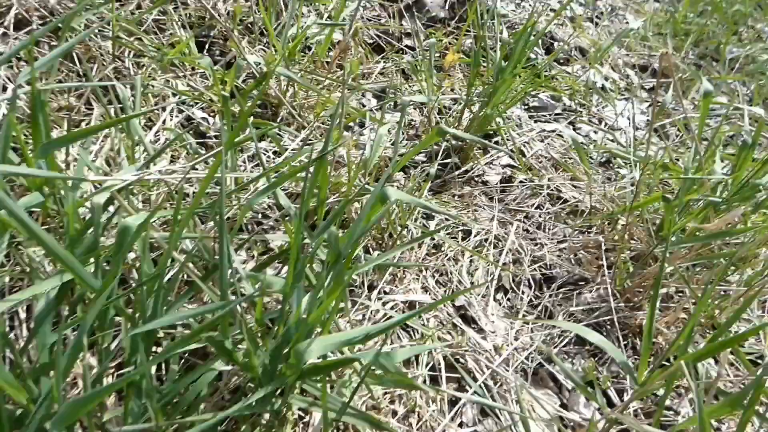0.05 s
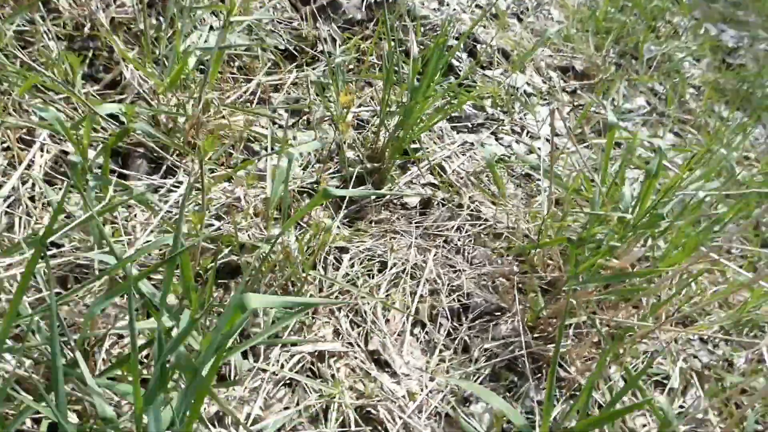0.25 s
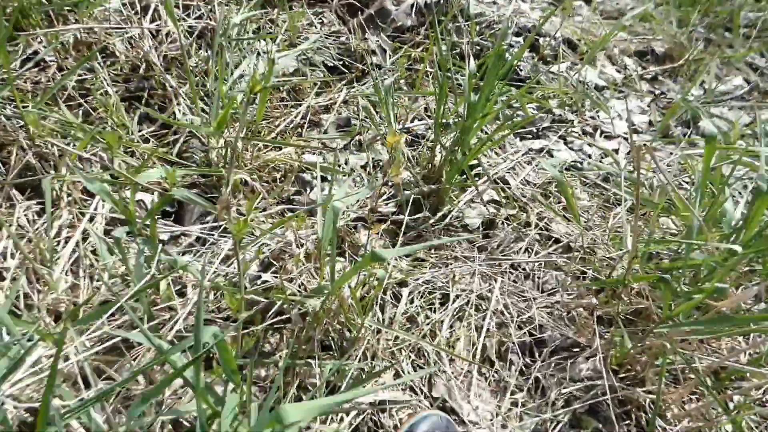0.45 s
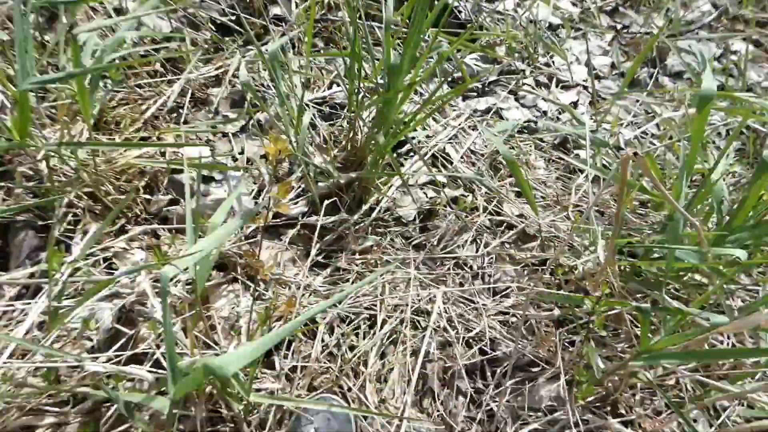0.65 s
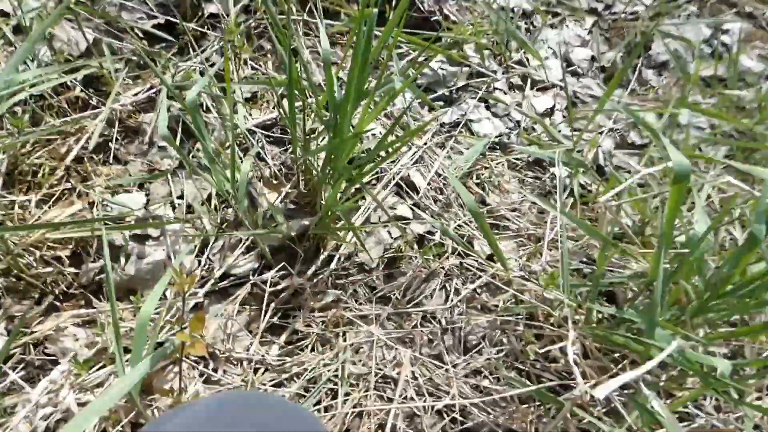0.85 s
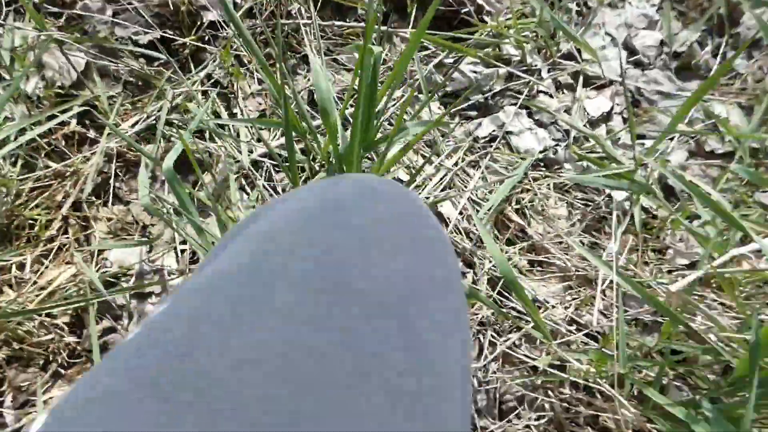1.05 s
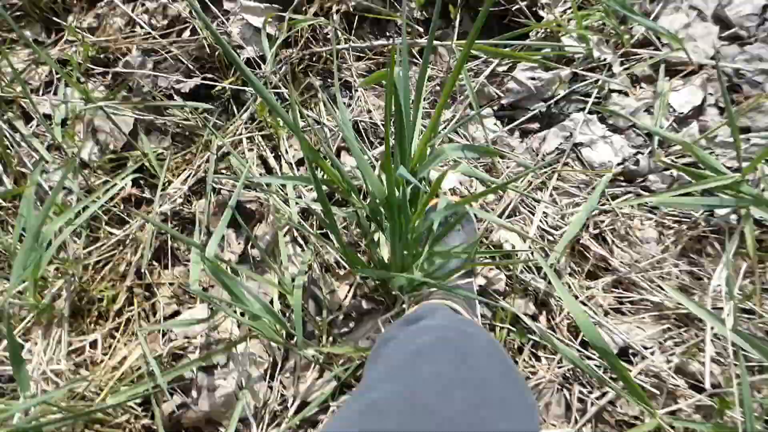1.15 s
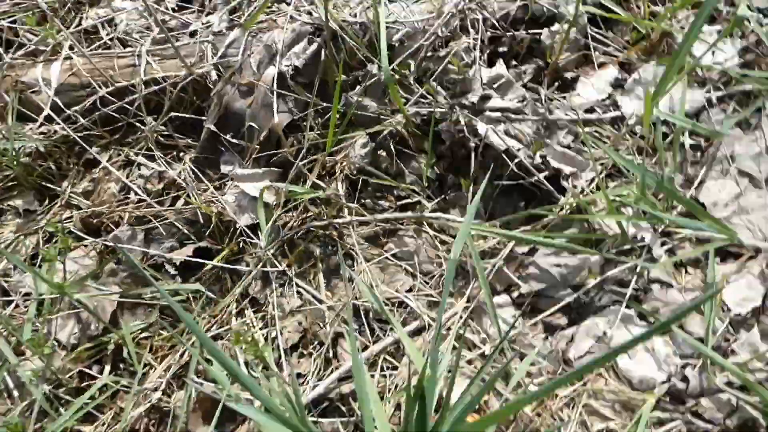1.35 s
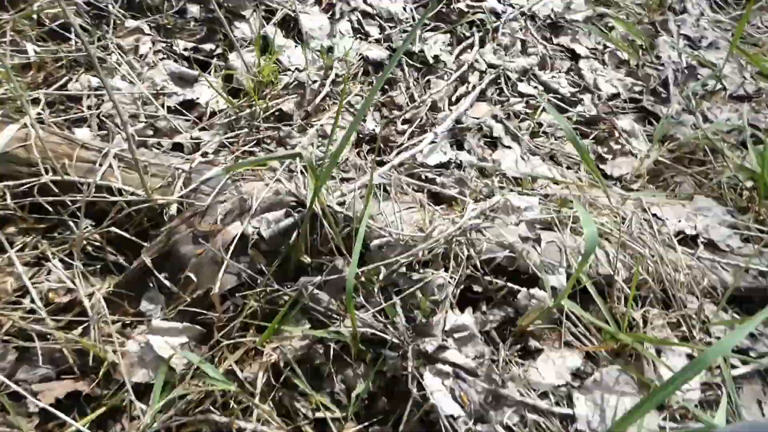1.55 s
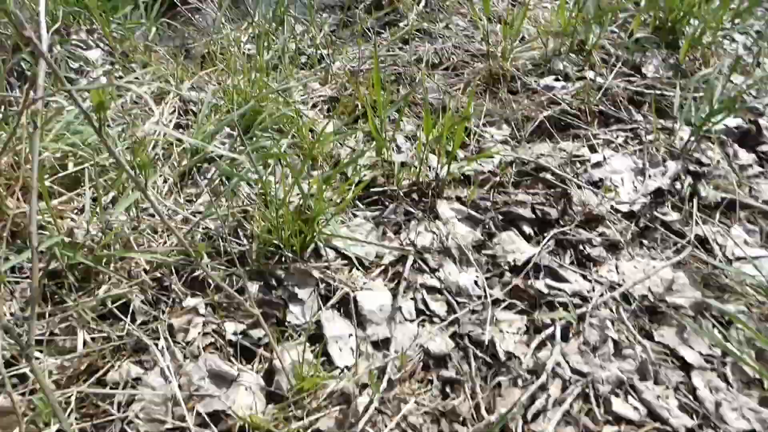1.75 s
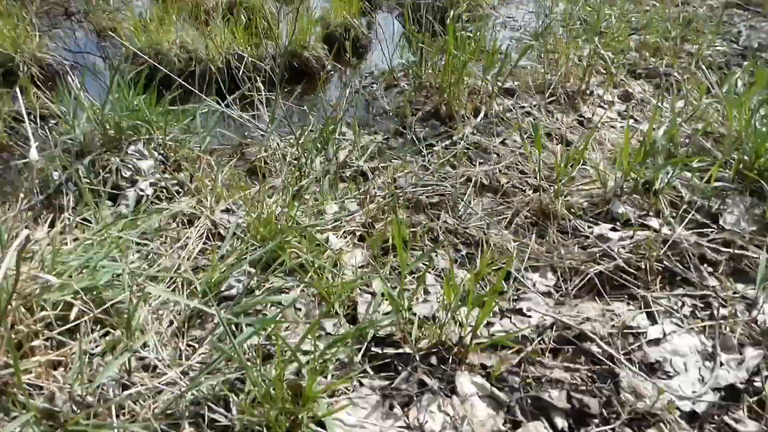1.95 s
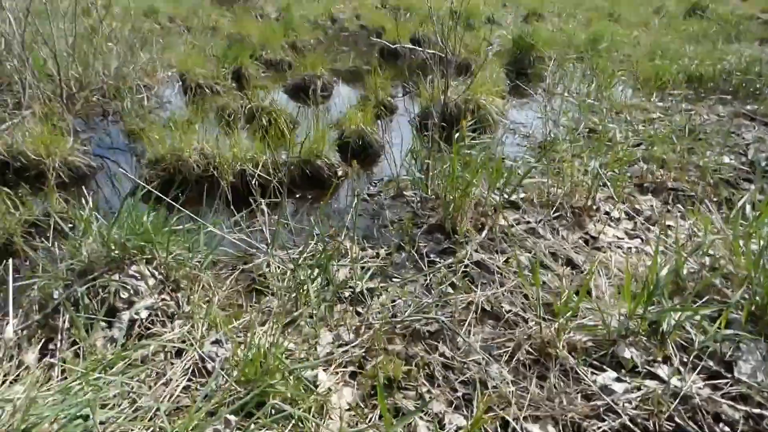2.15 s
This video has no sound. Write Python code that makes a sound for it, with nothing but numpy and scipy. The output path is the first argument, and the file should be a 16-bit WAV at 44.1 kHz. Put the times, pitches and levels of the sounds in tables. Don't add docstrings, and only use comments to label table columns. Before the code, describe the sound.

Someone walks slowly over dry litter in the woods; faint grass swishes first, then three crackly crunches with bright snaps, fading to quiet with a brief handling creak, under light wind rumble and soft rustling air.

```python
import sys
import numpy as np
from scipy import signal
from scipy.fft import rfft, irfft
from scipy.io import wavfile
from scipy.ndimage import uniform_filter1d

SR = 44100
rng = np.random.default_rng(int(sys.argv[2]) if len(sys.argv) > 2 else 0)


def makeup_ratio(level_db):
    decades = np.asarray(level_db, float) / 20
    return 10 ** decades


def dump(signal):
    limited = np.clip(np.atleast_2d(signal).T, -1, 1)
    pcm = np.round(limited * 32767).astype(np.int16)
    wavfile.write(sys.argv[1], SR, pcm)


N = 96534
T = np.arange(N) / SR


def evened(x):
    return x / np.sqrt(np.mean(x ** 2) + 1e-20)


def read(points, hz):
    f, value = np.transpose(points)
    return np.interp(np.log(hz + 1), np.log(f + 1), value)


def colour(x, points, more=((1, 0), (2, 0))):
    n = x.shape[-1]
    hz = np.fft.rfftfreq(n, 1 / SR)
    gain = makeup_ratio(read(points, hz) + read(more, hz))
    return irfft(rfft(x) * gain, n)


def slow(seconds, shape=N):
    width = max(int(seconds * SR), 1)
    once = uniform_filter1d(rng.standard_normal(shape), width)
    return evened(uniform_filter1d(once, width))


def ports(mid, side, pan_db=0):
    return np.array([(mid + side) * makeup_ratio(pan_db / 2), (mid - side) * makeup_ratio(-pan_db / 2)])


def add(mix, s, sound, pan_db):
    at = round(s * SR)
    part = mix[:, at:at + len(sound)]
    part += ports(sound, 0, pan_db)[:, :part.shape[1]]


def wavelet(hz, turns, phase=0):
    t = np.arange(int(turns / hz * SR) + 2) / SR
    return np.sin(np.pi * t / t[-1]) ** 2 * np.sin(2 * np.pi * hz * t + phase)


# (peak time [s], crackle level [dB], rise [dB/s], fall [dB/s], dead-leaf share [0-1])
FOOT_PRESSES = [(0.016, -39.5, 298, 76, 0.16), (.145, -42, 69, 170, 0.1), (0.247, -43.5, 200, 118, 0.64),
                (.40, -44, 32, 11, 0.1), (0.568, -24.5, 510, 186, 0.75), (0.599, -24.5, 318, 247, 0.22),
                (.68, -37, 194, 61, 0.18), (0.908, -33.5, 195, 366, 0.34), (1.022, -37, 106, 179, 0.24),
                (1.163, -24, 215, 163, 0.14), (1.25, -34.5, 87, 62, 0.44), (1.45, -41, 162, 84, 0.56),
                (1.56, -43, 103, 87, 0.65), (1.67, -36, 302, 100, 0.45), (1.687, -21, 1501, 123, 0.79),
                (1.791, -30, 206, 219, 0.57), (1.86, -41, 100, 118, 1.), (2.088, -47, 53, 106, 1.)]
# (time [s], left over right [dB])
FEET_PLACE = [
    (0, 1.5),
    (.5, 2),
    (.9, 2.5),
    (1.2, -1),
    (1.6, 2.5),
    (1.8, -4),
    (1.95, 2),
]
# (frequency [Hz], level [dB])
GRASS_SPECTRUM = [(200, -16), (700, -5), (2000, -3.5), (5000, -5.5), (10000, -3), (13000, -11),
                  (16300, -33.5)]
# (frequency [Hz], level [dB])
LEAF_SPECTRUM = [(200, -12.5), (600, -11.5), (1800, -9.5), (3000, -4), (4000, -5), (6000, -5),
                 (9500, -16.5), (16300, -39)]
# (frequency [Hz], side over middle [dB])
STEREO_WIDTH = [(60, 1.5), (300, -5.5), (1300, -10), (3200, -10), (4200, -16), (7000, -17.5), (8300, -6.5),
                (15000, -0.5)]


def litter():
    grains_per_s, grain_turns, size_db, clump_db = 8000, 5.13, 2, 2
    size = makeup_ratio(size_db * np.minimum(rng.exponential(1, N), 4) + clump_db * slow(0.0062))
    size = size * (rng.random(N) < grains_per_s / SR) * rng.choice([-1, 1], N)
    kind, place = rng.integers(0, 36, N), rng.standard_normal(N)
    crackle = np.zeros((2, N))
    for k, hz in enumerate(np.geomspace(250, 16000, 36)):
        grain = wavelet(hz, grain_turns * (hz / 4000) ** 0.084)
        grain = grain / np.linalg.norm(grain) * np.sqrt(hz)
        train = size * (kind == k)
        crackle += signal.oaconvolve([train, train * place], [grain], axes=1)[:, :N]
    crackle = crackle / np.std(crackle[0]) + rng.standard_normal((2, N))

    z = signal.stft(crackle, nperseg=256)[2]
    patches = uniform_filter1d(rng.standard_normal(z.shape[1:]), size=7, axis=0)
    patches = uniform_filter1d(patches, size=5, axis=1)
    crackle = signal.istft(z * makeup_ratio(evened(patches)), nperseg=256)[1][:, :N]

    s, db, rise, fall, leaf = np.transpose(FOOT_PRESSES)[:, :, None]
    distance_db = np.where(T < s, rise * (s - T), fall * (T - s))
    power = makeup_ratio(db - distance_db) ** 2
    leaf_share = np.clip((power * leaf).sum(0) / power.sum(0), 0, 1)
    mix = 0
    for spectrum, share in ((GRASS_SPECTRUM, 1 - leaf_share), (LEAF_SPECTRUM, leaf_share)):
        mid = colour(crackle[0], spectrum)
        side = colour(crackle[1], spectrum, STEREO_WIDTH)
        band = colour(mid, [(1900, -60), (2000, 0), (7000, 0), (7200, -60)])
        mix = mix + share * np.array([mid, side]) / np.std(band)
    pan_db = np.interp(T, *np.transpose(FEET_PLACE))
    return ports(*mix, pan_db) * np.sqrt(power.sum(0))


# (time [s], peak level [dB], ring [Hz],
# share of tick against ring [0-1])
STALK_SNAPS = [(0.019, -17, 9700, 0.13), (0.03, -13.5, 5900, 0.5), (0.081, -18, 2300, 0.43),
               (0.115, -18.5, 10000, 0.73), (0.132, -15.5, 3830, 0.65), (0.139, -18, 5400, 0.4),
               (0.149, -15.5, 7000, 0.6), (0.156, -18.5, 2020, 0.58), (0.223, -21, 4300, 0.3),
               (0.245, -18, 5400, 0.62), (0.273, -16.5, 1060, 0.55), (0.384, -17, 6200, 0.42),
               (0.506, -23, 1550, 0.97), (0.565, -18.5, 2280, 0.14), (0.588, -31, 5950, 0.6),
               (0.737, -18.5, 6130, 0.6), (0.908, -15.5, 3650, 0.28), (1.182, -5, 10400, 0.22),
               (1.293, -21, 6100, 0.2), (1.516, -13, 9550, 0.35), (1.634, -10, 9460, 0.27),
               (1.688, -23, 4770, 0), (2.175, -21.5, 1700, 0.28),
               (.099, -21.5, 2470, 0.46), (.187, -24, 3500, 0.47), (.574, -18, 2300, .2),
               (.5865, -18, 2810, 0), (.5923, -8, 5740, 0.2), (.600, -14, 5960, 0.1), (.607, -15, 5200, 0),
               (.6125, -17, 6500, 0), (.619, -9, 5440, 0.4), (.630, -14, 2750, 0.43),
               (1.1345, -13, 4550, .3), (1.1373, -7, 10400, 0.63), (1.148, -9, 9700, .3),
               (1.1535, -16, 5500, 0.2), (1.162, -16, 6000, .4), (1.177, -15, 3770, 0.4),
               (1.196, -9.5, 9500, 0.35), (1.2335, -19, 4160, 0.7), (1.640, -33, 9300, 0.3),
               (1.6495, -26, 6000, 0.5), (1.682, -15, 5750, 0.25), (1.6908, -12, 4600, 0),
               (1.697, -17, 3000, 0), (1.7005, -14, 4800, .2), (1.7055, -13.5, 5470, 0.5),
               (1.782, -23, 3960, 0), (1.833, -23, 4000, 0.3)]
# (frequency [Hz], level [dB])
TICK_SPECTRUM = [(400, -74), (1500, -1), (5000, 0.5), (11000, 2.5), (14500, -16), (16300, -26)]


def snaps():
    tick_t60, tail_db, tail_t60, ring_turns = 0.015, -14.5, 0.044, 4.8
    out, t = np.zeros((2, N)), np.arange(2048) / SR
    fade = makeup_ratio(-60 * t / tick_t60) + makeup_ratio(tail_db - 60 * t / tail_t60)
    onset = np.minimum(t / 0.00022, 1)
    for s, db, hz, tick in STALK_SNAPS:
        noise = rng.standard_normal(2048)
        sound = tick * evened(colour(noise, TICK_SPECTRUM)) * fade * onset
        ring = wavelet(hz, ring_turns * (hz / 4000) ** .5)
        sound[:len(ring)] += (1 - tick) * 2 * ring
        pan_db = 2 * np.interp(s, *np.transpose(FEET_PLACE))
        add(out, s, makeup_ratio(min(db, -6)) * sound / 2, pan_db)
    return out


# (middle time [s], level [dB], pitch [Hz], length [s])
LEAF_CRUMPLES = [(0.44, -44, 2300, .02), (0.571, -34, 2220, .03), (0.599, -38, 880, 0.053),
                 (0.739, -37.5, 455, 0.021), (0.899, -42.5, 2000, 0.029), (1.149, -35, 11000, .06),
                 (1.436, -39.5, 2240, 0.018), (1.48, -40, 2200, .012), (1.568, -40.5, 2400, .012),
                 (1.79, -30, 3930, .07), (2.091, -43.5, 4500, 0.017), (2.154, -47, 1620, .012)]


def crumples():
    out = np.zeros((2, N))
    edge, flicker_db = 1.13, 2
    for s, db, hz, length in LEAF_CRUMPLES:
        noise = rng.standard_normal((2, 4096))
        hump = [(hz / edge ** 3, -30), (hz / edge, -3), (hz, 0), (hz * edge, -3), (hz * edge ** 3, -30)]
        band = evened(colour(noise[0], hump))
        band = band * makeup_ratio(flicker_db * evened(uniform_filter1d(noise[1], size=90)))
        n = min(int(length * 2 * SR), 4096)
        pan_db = np.interp(s, *np.transpose(FEET_PLACE))
        add(out, s - n / SR / 2, makeup_ratio(db) * band[:n] * np.hanning(n), pan_db)
    return out


# (frequency [Hz], level [dB])
SCRAPE_SPECTRUM = [(410, -48), (700, 9), (1410, -2), (8780, 1), (13200, -0.5), (16300, -40)]


def creak():
    start, length = 2.013, 0.0205
    slip_hz, sag, jitter = 420, .36, .1
    out, t = np.zeros((2, N)), np.arange(3000) / SR
    sagging = 1 - sag * np.minimum(t / length, 1) ** 0.713
    turns = np.cumsum(slip_hz * sagging * (1 + jitter * slow(0.0012, 3000))) / SR
    on = np.clip((length - t) / 0.00078, 0, 1)
    tail = makeup_ratio(-11 - 60 * np.maximum(t - length, 0) / .05)
    on = on + (1 - on) * tail

    thud_spectrum = [(150, -10), (300, 1), (430, 7), (800, -2), (1200, -10), (2000, -38)]
    thud = evened(colour(rng.standard_normal(3000), thud_spectrum))
    body = np.sin(2 * np.pi * turns)
    body += makeup_ratio(-3.5) * np.sin(4 * np.pi * turns + 1)
    body += makeup_ratio(-10) * np.sin(6 * np.pi * turns)
    body += makeup_ratio(-3) * thud
    body = makeup_ratio(-25.5) * body * np.minimum(.25 + t / .012, 1)
    scrape = evened(colour(rng.standard_normal(3000), SCRAPE_SPECTRUM))
    scrape = scrape * (0.71 + np.exp(-(turns % 1) / 0.34))
    add(out, start, (body + makeup_ratio(-25.5) * scrape) * on, 0)
    crack = evened(colour(rng.standard_normal(300), TICK_SPECTRUM)) * makeup_ratio(-18.5 - 60 * t[:300] / 0.0041)
    add(out, start - .002, crack, 0)
    return out + 0.202 * ports(0, np.roll(out[0], 9))


# (time [s], peak level [dB], pitch [Hz], length [turns])
WIND_BUFFETS = [(0.0475, -24, 260, 2.3), (0.057, -24.5, 240, 3.4), (0.22, -34, 167, 3.3),
                (0.235, -29, 183, 2.27), (0.305, -31, 140, 3.6), (0.352, -25.5, 134, 3.4),
                (0.445, -39, 110, 4), (0.5, -33, 196, 3.5), (.513, -33, 150, 3), (0.53, -29, 115, 3.8),
                (.535, -34, 300, 4), (0.552, -27.5, 241, 4), (0.684, -32, 465, 3.1), (.845, -37, 100, 3),
                (0.924, -37, 120, 3.6), (0.981, -41, 235, 4.3), (1.075, -37, 90, 3), (1.371, -36, 115, 3),
                (1.492, -34, 160, 3.8), (1.517, -31, 140, 2.6), (1.62, -37, 109, 3.9),
                (1.729, -29, 128, 4.2), (1.752, -33, 95, 3), (1.81, -32, 280, 4), (1.84, -38, 115, 4),
                (1.965, -40, 75, 4)]
# (frequency [Hz], level [dB])
BREEZE_SPECTRUM = [(15, -56), (25, -23.5), (97, 2.5), (233, 0), (263, -5.5), (600, -3.5), (780, -14.5),
                   (1320, -120)]


def wind():
    breeze_db, lump_db = -48, 4
    a, b = colour(rng.standard_normal((2, N)), BREEZE_SPECTRUM + [(1500, -60)])
    out = ports(a * makeup_ratio(lump_db * slow(0.02)), .5 * b * makeup_ratio(lump_db * slow(0.023)))
    out = evened(out) * makeup_ratio(breeze_db)

    gust_s, gust_length, gust_db = .015, .235, -37.5
    gust_hz, gust_end_hz, wobble = 215, 135, .16
    u = np.linspace(0, 1, int(gust_length * SR))
    n = len(u)
    hz = gust_hz * (gust_end_hz / gust_hz) ** u * (1 + wobble * slow(0.0042)[:n])
    flutter = np.sin(2 * np.pi * np.cumsum(hz) / SR) * makeup_ratio(3 * slow(.008)[:n])
    rough = colour(rng.standard_normal(n), [(70, -30), (130, 0), (350, -4), (480, -25)])
    flutter = flutter + makeup_ratio(-3) * evened(rough)
    add(out, gust_s, makeup_ratio(gust_db) * flutter * np.sin(np.pi * u) ** 0.46, -1)

    rough_spectrum = [(100, -43), (200, 12.0), (400, -5.5), (800, -36.5)]
    for s, db, hz, turns in WIND_BUFFETS:
        puff = wavelet(hz, turns)
        n = len(puff)
        rough = evened(colour(rng.standard_normal(4096), rough_spectrum))[:n]
        puff = puff + makeup_ratio(-6.5) * np.hanning(n) * rough
        pan_db = rng.choice([-5, 5])
        add(out, s - .003, makeup_ratio(db) * puff * np.linspace(1.3, .6, n), pan_db)
    return out


# (frequency [Hz], level [dB])
WOODS_SPECTRUM = [(30, -9.5), (300, -4), (1500, -6.5), (4600, -17), (7000, -24), (11000, -21.5),
                  (13000, -27), (16300, -62)]


def woods():
    patch_db, woods_db = 1, -44
    a, b = rng.standard_normal((2, N)) * makeup_ratio(patch_db * slow(0.1, (2, N)))
    mid = colour(a, WOODS_SPECTRUM)
    side = colour(b, WOODS_SPECTRUM, STEREO_WIDTH)
    return ports(mid, side) * makeup_ratio(woods_db) / np.std(mid)


def scene():
    return litter() + snaps() + crumples() + creak() + wind() + woods()


def band_limit(x):
    return signal.sosfilt(signal.butter(12, 16510, fs=SR, output="sos"), x)


# (frequency [Hz], level [dB])
MICROPHONE_CAVITY = [(5000, 0), (6500, 1.5), (7900, -4.5), (9600, 0.5), (11500, -3.5)]


def record(dry):
    side_gate_db, top_gate_db, top_hz = -14, -27, 12500
    left, right = colour(dry, MICROPHONE_CAVITY, [(25, -12), (70, -0.5)])
    z = signal.stft([left + right, left - right], nperseg=1024)[2]
    power = uniform_filter1d(abs(z) ** 2, size=24, axis=1)
    power = uniform_filter1d(power, size=3, axis=2)
    z[1] *= power[1] > power[0] * makeup_ratio(side_gate_db) ** 2
    middle = power[0, 40:250]
    whole = uniform_filter1d(middle.mean(0), size=3) ** .9 * middle.mean() ** .1
    below_top = np.fft.rfftfreq(1024, 1 / SR)[:, None] < top_hz
    strong = uniform_filter1d(abs(z) ** 2, size=9, axis=1) > whole * makeup_ratio(top_gate_db) ** 2
    z *= below_top | strong
    mix = ports(*signal.istft(z, nperseg=1024)[1][:, :N]) / 2
    return band_limit(mix)


dry = scene()
out = record(dry)
dump(out)
```